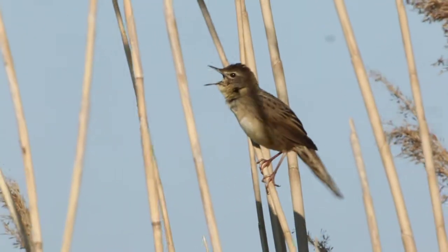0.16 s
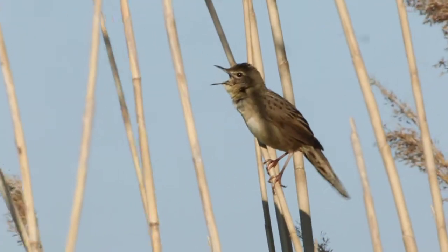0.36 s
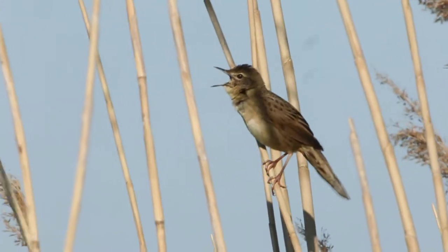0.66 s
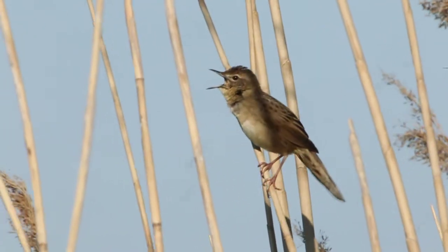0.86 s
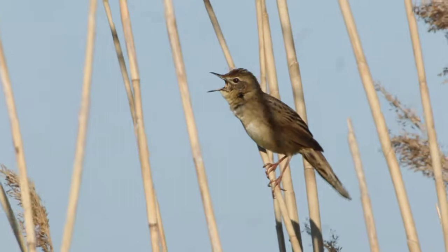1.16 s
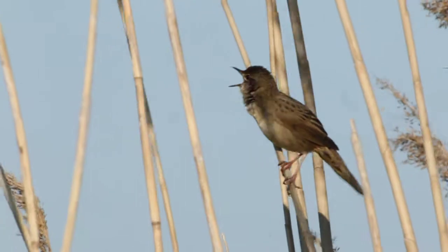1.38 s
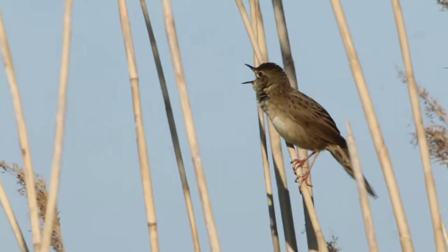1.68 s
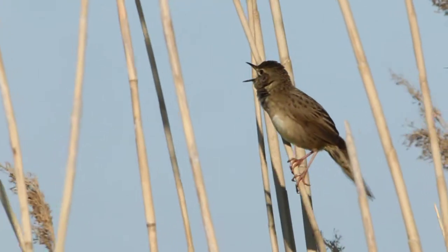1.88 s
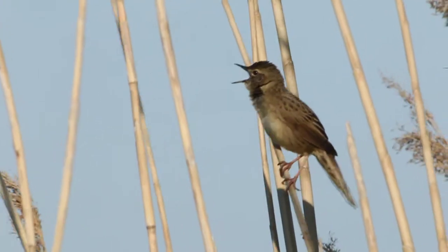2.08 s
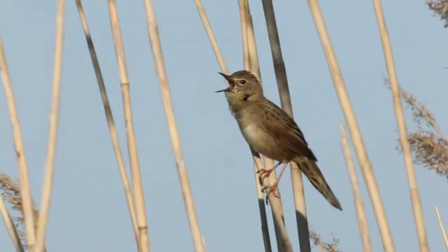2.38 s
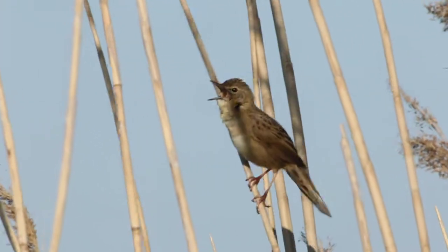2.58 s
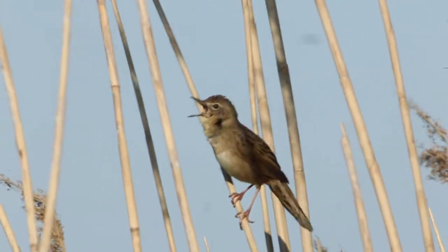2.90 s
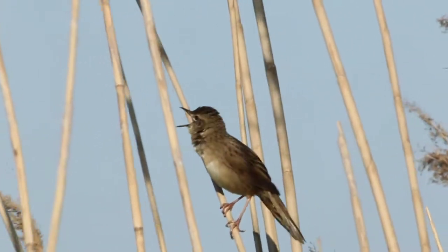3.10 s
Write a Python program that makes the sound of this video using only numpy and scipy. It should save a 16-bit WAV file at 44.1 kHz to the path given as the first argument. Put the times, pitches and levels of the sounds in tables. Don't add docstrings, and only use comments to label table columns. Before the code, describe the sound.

Fast dry cricket-like trill from a close reed bird throughout, fading and swelling as its head turns; brief distant chirps and whistles, faint stem taps and soft air hush, outdoors, microphone a few metres away.

```python
import sys
import numpy as np
from scipy import signal
from scipy.fft import rfft, irfft, next_fast_len
from scipy.io import wavfile
from scipy.ndimage import uniform_filter1d

SR = 44100
rng = np.random.default_rng(int(sys.argv[2]) if len(sys.argv) > 2 else 0)


def digitize_waveform(pressure):
    field = np.atleast_2d(pressure).T
    bounded = np.clip(field, -1, 1)
    quanta = np.round(bounded * 32767).astype(np.int16)
    wavfile.write(sys.argv[1], SR, quanta)


def boost(x):
    u = np.asarray(x, float) / 20
    return 10 ** u


N = 143325

CYCLE_S = 0.0399
FACING_DB = -10.5
WARBLE_HZ = 136.5


def walk(rate_hz):
    k = int(SR / rate_hz)
    held = np.repeat(rng.standard_normal(N // k + 1), k)
    return 1.295 * uniform_filter1d(uniform_filter1d(held, k), k)[:N]


def add(out, at_s, shapes):
    index = np.round(np.asarray(at_s) * SR).astype(int)[:, None] + np.arange(shapes.shape[1])
    inside = (index >= 0) & (index < N)
    np.add.at(out, index[inside], shapes[inside])


def tail(t60_s):
    t = np.arange(int(t60_s * SR)) / SR
    build_up = np.minimum(t / 0.0026, 1)
    h = rng.standard_normal(SR)[:len(t)] * boost(-60 * t / t60_s) * build_up
    return h / np.sqrt(np.sum(h ** 2))


def voiced(hz, env, overtone_db, start, hook_hz=0):
    phase = 2 * np.pi * (np.cumsum(hz, axis=1) / SR + start)
    hook = 2 * np.pi * np.cumsum(hook_hz + 0 * hz, axis=1) / SR
    top = env.max(axis=1, keepdims=True)
    overtone = boost(overtone_db) * top * (env / top) ** 1.3
    return env * np.sin(phase) + overtone * np.sin(2 * (phase + hook))


# f/Hz, level/dB (per Hz)
HUSH_SPECTRUM = [
    (28, -8),
    (55, -3.5),
    (150, 0.5),
    (450, -10.5),
    (2000, -11),
    (4000, -9.5),
    (9000, -11.5),
    (15500, -23),
]


def hush():
    rumble_hz, rumble_fade_db_per_s = 130, 1
    size = next_fast_len(N)
    octave = np.log2(np.arange(size // 2 + 1) * SR / size + 1)
    hz, db = np.array(HUSH_SPECTRUM).T
    colour = boost(np.interp(octave, np.log2(hz), db, left=-30))
    swell, out = walk(0.36), 0
    for centre in np.arange(4., 16.):
        share = np.sqrt(np.clip(1 - np.abs(octave - centre), 0, 1))
        band = irfft(rfft(rng.standard_normal(size)) * colour * share, size)[:N]
        fade_db = (2 ** centre < rumble_hz) * rumble_fade_db_per_s * np.arange(N) / SR
        out = out + band * boost(0.14 * swell + 0.59 * walk(8.98) - fade_db)
    return boost(-58.5) * out / np.sqrt(np.mean(out ** 2))


# cycle number, note onset t/s
REEL_BEAT = [(0, 0.0102), (5, 0.2072), (19, 0.7623), (24, 0.9641), (34, 1.3621), (41, 1.6433), (43, 1.7),
             (50, 1.9787), (65, 2.5807), (70, 2.7786), (75, 2.9807), (77, 3.0595), (81, 3.22)]
# t/s, note level/dB, tick level/dB (re note),
# overtone level/dB (re note), note f/Hz
REEL_COURSE = [(0.01, -19, -4, -30.5, 6000), (0.29, -21, -1, -27.5, 6086), (0.52, -16.5, -2.5, -31, 5984),
               (0.72, -18.5, -2, -35, 6080), (0.92, -25, 1, -26.5, 6120), (1.2, -22, -1.5, -24, 5970),
               (1.4, -30, 3.5, -23.5, 6046), (1.48, -24.5, -0.7, -28, 5960), (1.6, -30.5, 3.5, -23, 5940),
               (1.78, -26.5, 1.5, -26.5, 5950), (2.1, -20, -1.5, -27, 6010), (2.3, -14, -2, -33.5, 6076),
               (2.38, -14.5, -5, -29.5, 6110), (2.66, -17.5, -3.5, -32, 6050), (2.9, -16, -3.5, -28, 6100),
               (3.1, -19.5, -3.5, -32.5, 6070), (3.22, -18.5, -3, -31, 6010)]


def warbler():
    stutter_cycle = 42
    rise_s, peak_s, swell_db, fall_db_per_s = 0.00054, 0.0022, 6, 2887
    sag_hz, sag_s, hook_hz, hook_s = 265, 0.0044, 260, 0.0006
    after_s, after_wide_s, after_db, after_drop_hz, after_follow = 0.0063, 0.0014, -11, 270, 0.65
    tick_lead_s, tick_wide_s, tick_top_hz, tick_range_hz, tick_climb_s = 0.0129, 0.00046, 7255, 1180, 0.0007
    tick_tail_s, tick_tail_wide_s, tick_tail_hz, tick_tail_db = 0.0019, 0.0008, 6550, -11
    click_lead_s, click_wide_s, click_hz, click_db, click_overtone_db = 0.0178, 0.00045, 3050, -31, 11.5

    count, times = np.array(REEL_BEAT).T
    count, times = np.append(count, count[-1] + 1), np.append(times, times[-1] + CYCLE_S)
    onset = np.interp(np.arange(count[-1] + 1), count, times)
    onset[stutter_cycle] = onset[stutter_cycle - 1] + CYCLE_S
    sung = (np.arange(len(onset)) != stutter_cycle)[:, None]
    course = np.array(REEL_COURSE).T
    note_db, tick_db, over_db, hz = (np.interp(onset, course[0], c)[:, None] for c in course[1:])
    chance = rng.standard_normal((len(onset), 8)).T[:, :, None]
    turn = rng.random((len(onset), 4)).T[:, :, None]
    hz = hz + 29 * chance[0]

    span = 1 / 100
    t = np.arange(int(span * SR))[None] / SR
    u = t - span / 2

    def bell(wide_s, late_s=0):
        return np.exp(-((u - late_s) / wide_s) ** 2)

    out = np.zeros(N)
    shape_db = -swell_db * np.maximum(1 - t / peak_s, 0) - fall_db_per_s * np.maximum(t - peak_s, 0)
    shape_db = shape_db - 13.5 * np.maximum(t / sag_s - 1, 0) ** 2
    shape = np.sin(np.pi / 2 * np.clip(t / rise_s, 0, 1)) ** 2 * boost(shape_db)
    shape = uniform_filter1d(shape, size=11, axis=1, mode="constant")
    note = voiced(hz - sag_hz * (t / sag_s) ** 2, shape * boost(-0.05 * chance[1]),
                  over_db - 0.5 + 0.78 * chance[2], turn[0], hook_hz * np.exp(-t / hook_s))
    add(out, onset - rise_s / 2, sung * note)

    level_db = after_db + (after_follow - 1) * (note_db - FACING_DB) + 1.4 * chance[3]
    after = voiced(hz - after_drop_hz + 0 * t, bell(after_wide_s) * boost(level_db), over_db - 1.5, turn[1])
    add(out, onset + after_s - span / 2, sung * after)

    tick_hz = np.maximum(tick_top_hz - tick_range_hz * np.exp(-u / tick_climb_s), 3200)
    climb = 2 * np.pi * (np.cumsum(tick_hz, axis=1) / SR + turn[2])
    tick = (bell(tick_wide_s) + boost(-26) * bell(tick_wide_s, -0.0005)) * np.sin(climb)
    octave_db = -31 + 0.25 * (over_db + 28) + 1.6 * chance[6]
    octave_env = 0.9 * bell(tick_wide_s, -0.0006) + 1.2 * bell(tick_wide_s, 0.00035)
    tick = tick + boost(octave_db) * octave_env * np.sin(2 * climb)
    tail_hz = tick_tail_hz + 300000.0 * (u - tick_tail_s) + 0 * hz
    tick = tick + voiced(tail_hz, boost(tick_tail_db) * bell(tick_tail_wide_s, tick_tail_s), -41, turn[1])
    tick_at = onset - tick_lead_s - span / 2 + 0.00012 * chance[4, :, 0]
    add(out, tick_at, tick * boost(tick_db + 0.6 * chance[5]))

    click_env = bell(click_wide_s) * boost(click_db + 1.6 * chance[7])
    click = voiced(click_hz + 0 * u + 120 * chance[0], click_env, click_overtone_db, turn[3])
    add(out, onset - click_lead_s - span / 2, click)
    return out, np.interp(np.arange(N) / SR, course[0], course[1])


# delay t/s, level/dB
REFLECTIONS = [
    (.0047, -17),
    (0.0095, -24),
    (0.0153, -18),
    (0.0172, -23),
]


def reeds(reel, facing_db):
    sway_hz, echo_follow, scatter_follow = 1.6, 0.54, 0.23
    t60_s, diffuse_db, scatter_low_hz = 0.13, -12.5, 6200
    i = np.arange(N)
    x = signal.sosfilt(signal.butter(2, 4500, "high", fs=SR, output="sos"), reel)
    near = x * boost(FACING_DB + echo_follow * (facing_db - FACING_DB))
    wide = x * boost(FACING_DB + scatter_follow * (facing_db - FACING_DB))
    out = np.zeros(N)
    for lag_s, db in REFLECTIONS:
        level = boost(db + 1.6 * walk(sway_hz))
        out += level * np.interp(i - SR * (lag_s + 0.00025 * walk(sway_hz)), i, near)
    sway = [walk(2.227 * sway_hz) for _ in range(3)]
    band_hz = [scatter_low_hz, 1.7 * scatter_low_hz]
    wide = signal.sosfilt(signal.butter(1, band_hz, "band", fs=SR, output="sos"), wide)
    norm = np.sqrt(sum(s ** 2 for s in sway) + 1e-9)
    diffuse = sum(signal.fftconvolve(wide * s / norm, tail(t60_s))[:N] for s in sway)
    return out + boost(diffuse_db) * diffuse


# start t/s, length t/s, first f/Hz, last f/Hz, level/dB
FAR_CHIRPS = [(.002, 0.023, 3260, 2450, -50), (0.03, 0.012, 2500, 2300, -62),
              (0.174, 0.026, 3350, 2430, -55), (0.2, 0.017, 2460, 2130, -60),
              (0.226, 0.018, 2300, 2200, -64), (.388, 0.203, 1246, 1156, -63),
              (0.481, 0.015, 3000, 2680, -56), (.522, 0.022, 2640, 3180, -66), (.51, .014, 1930, 2300, -63),
              (.768, 0.022, 3120, 2650, -61), (.78, 0.015, 3090, 3050, -55),
              (0.782, 0.033, 2640, 2240, -62), (0.822, 0.024, 2350, 2120, -62),
              (0.858, 0.015, 2300, 2130, -58), (.888, .02, 2180, 2220, -62),
              (1.446, 0.028, 3540, 2930, -54), (1.468, 0.044, 2040, 1980, -67.5),
              (1.647, 0.024, 3070, 2470, -58.5), (1.811, 0.016, 2330, 2100, -54.5),
              (1.842, 0.011, 2240, 2050, -52), (1.871, .014, 2230, 2050, -55.5),
              (1.906, 0.015, 2160, 2100, -56), (1.91, 0.015, 3960, 3420, -48),
              (2.095, 0.025, 2490, 2630, -66), (2.29, 0.042, 3500, 3500, -54.5),
              (2.345, 0.049, 3490, 3400, -58), (2.271, 0.017, 5500, 4900, -38),
              (2.339, 0.025, 5130, 4820, -49), (2.4, .026, 5120, 4750, -46.5),
              (2.392, 0.0076, 4850, 4750, -41), (2.33, .014, 4950, 5150, -48),
              (2.72, .07, 1200, 1170, -71), (2.75, .03, 3500, 3400, -64), (2.755, .015, 2320, 2270, -64),
                (2.783, .018, 2300, 2220, -63), (2.818, .016, 2260, 2220, -65),
                (2.82, .03, 2820, 2780, -63), (2.955, .035, 3000, 2850, -65), (3.09, .04, 3020, 2970, -65),
                (3.21, .028, 2880, 2900, -60), (3.2, .05, 1380, 1420, -68), (3.13, .03, 3650, 3580, -64),
                (1.845, .018, 3200, 2950, -62), (1.865, .018, 2700, 2400, -65),
                (1.905, .016, 3100, 2850, -62), (1.41, .02, 2500, 2250, -64), (.158, .018, 3520, 3520, -61)]
# (t/s, f/Hz)
FAR_WHISTLES = [
    (-57.5, -4, [(1.548, 3140), (1.568, 3350), (1.615, 3500), (1.64, 3720), (1.674, 4420)]),
    (-54, -2, [(1.74, 3130), (1.77, 3470), (1.79, 3640), (1.801, 3480), (1.82, 2830)]),
    (-57, -1, [(1.89, 3050), (1.91, 3400), (1.925, 3480), (1.942, 3300), (1.96, 2980)]),
    (-66, -2, [(2.053, 2780), (2.068, 3000), (2.08, 2980), (2.094, 2850)]),
]


def far_birds():
    t, out = np.arange(N) / SR, np.zeros(N)
    chirps = FAR_CHIRPS
    calls = [(db, 0, [(s, first), (s + length, last)]) for s, length, first, last, db in chirps]
    for db, depth, path in calls + FAR_WHISTLES:
        s, hz = np.array(path).T
        on = (t >= s[0]) & (t < s[-1])
        u, length = t[on], s[-1] - s[0]
        edge = np.clip(np.minimum((u - s[0]) / 0.005, (s[-1] - u) / 0.012), 0, 1)
        fade_db = -7 * min(length / 0.17 + (depth > 0), 1) ** 2
        edge = edge * boost(fade_db * (u - s[0]) / length)
        pitch = np.interp(u, s, hz) + depth * np.sin(2 * np.pi * WARBLE_HZ * (u - s[0]))
        out[on] += boost(db) * edge * np.sin(2 * np.pi * np.cumsum(pitch) / SR)
    out = out * boost(1.5 * walk(70))
    nearer = trills()
    return out + nearer + boost(-8) * signal.fftconvolve(out + 0.5 * nearer, tail(0.21))[:N]


# t/s, f/Hz, damping in cycles, level/dB
STEM_KNOCKS = [
    (.0295, 9500, 4, -35),
    (.15, 9500, 5, -44),
    (2.292, 1100, 2.2, -50),
    (.99, 1050, 3, -56),
    (1.615, 900, 3, -55),
    (1.2, 300, 4, -54),
    (1.495, 300, 5, -52),
    (1.93, 300, 4, -54),
    (2.24, 300, 4, -54),
]


def knocks():
    s, hz, cycles, db = np.array(STEM_KNOCKS).T[:, :, None]
    t, out = np.arange(SR // 20) / SR, np.zeros(N)
    add(out, s[:, 0], boost(db) * np.exp(-t * hz * 2 / cycles) * np.sin(2 * np.pi * hz * t))
    return out


# t/s, f/Hz, level/dB, warble depth f/Hz
TRILL_PATHS = [
    [(1.329, 4260, -52, 0), (1.335, 4900, -35.5, 0), (1.35, 4700, -37.5, 0), (1.36, 4520, -33, 23),
     (1.364, 4535, -38, 250), (1.39, 4500, -40.5, 230), (1.411, 4500, -45, 194), (1.424, 4350, -58, 150)],
    [(1.857, 4930, -54, 100), (1.862, 4830, -43, 130), (1.872, 4540, -43.5, 130), (1.897, 4450, -42.5, 130),
     (1.904, 4200, -54, 100)],
]


def trills():
    t, out = np.arange(N) / SR, np.zeros(N)
    for rows in TRILL_PATHS:
        s, hz, db, depth = np.array(rows).T
        on = (t >= s[0]) & (t < s[-1])
        turn = 2 * np.pi * WARBLE_HZ * (t[on] - s[0])
        depth = np.interp(t[on], s, depth)
        pulse = 1 + 0.55 * np.clip(depth / 200, 0, 1) * np.sin(turn + 2.7)
        pitch = np.interp(t[on], s, hz) + depth * np.sin(turn + 2.0)
        out[on] += boost(np.interp(t[on], s, db)) * pulse * np.sin(2 * np.pi * np.cumsum(pitch) / SR)
    return out


def scene():
    reel, facing_db = warbler()
    mix = hush() + reel * boost(facing_db) + reeds(reel, facing_db) + far_birds() + knocks()
    lead = int(5 * (CYCLE_S - 0.0005) * SR)
    earlier = reel * (np.arange(N) < lead)
    mix[:N - lead] += reeds(earlier, facing_db)[lead:]
    return mix[None]


def band_limit(x):
    return signal.sosfilt(signal.butter(12, 16410, fs=SR, output="sos"), x)


def record(dry):
    top_hz = 15750
    mix = signal.sosfilt(signal.ellip(8, 0.2, 70, top_hz, fs=SR, output="sos"), dry)
    return band_limit(mix)


dry = scene()
out = record(dry)
digitize_waveform(out)
```